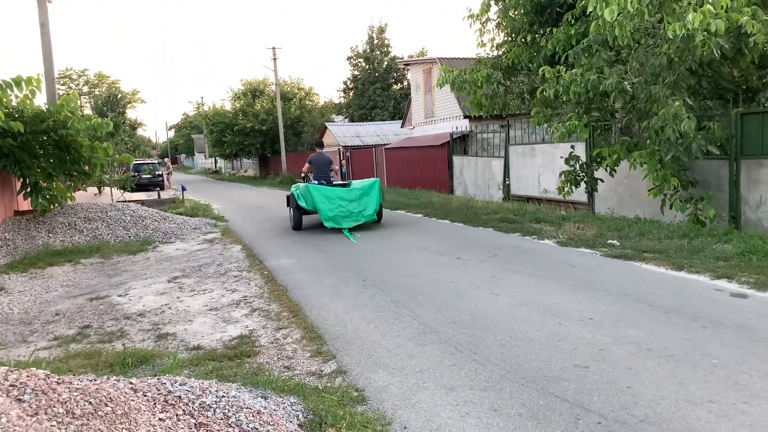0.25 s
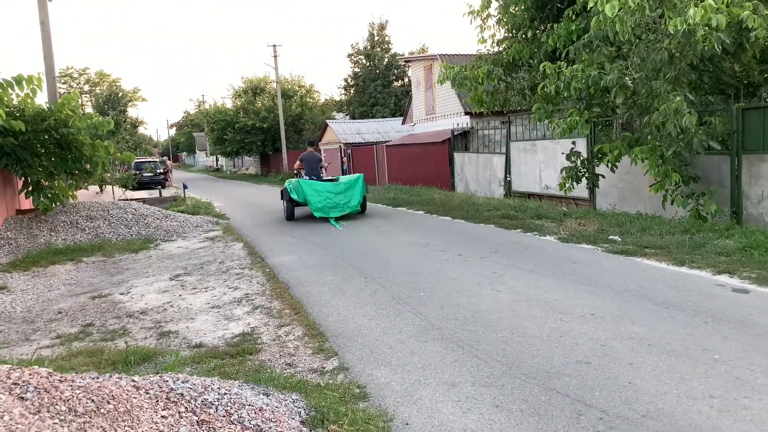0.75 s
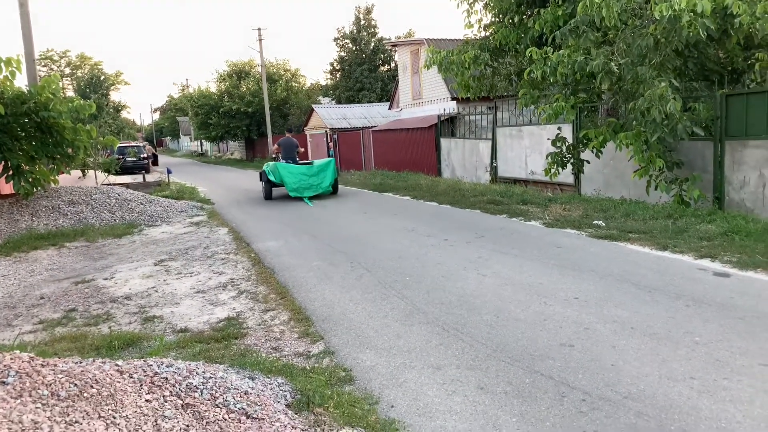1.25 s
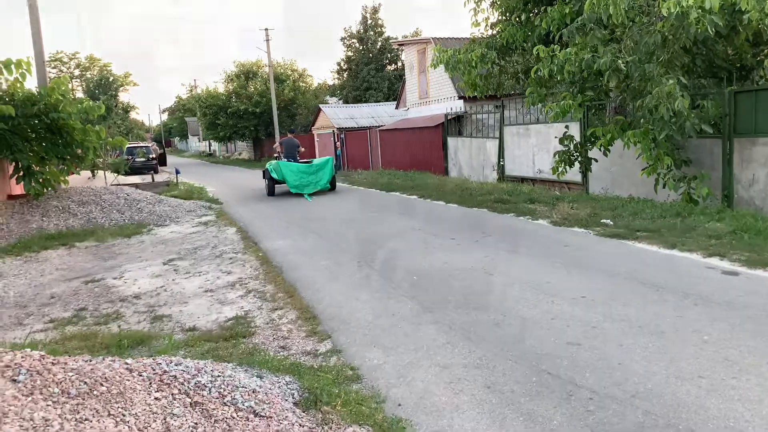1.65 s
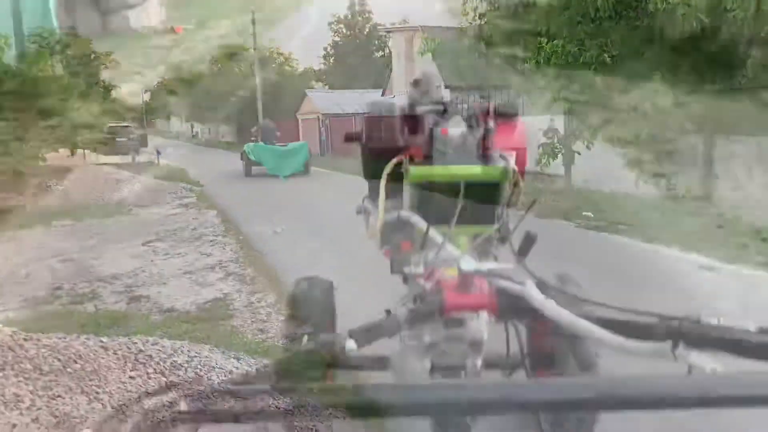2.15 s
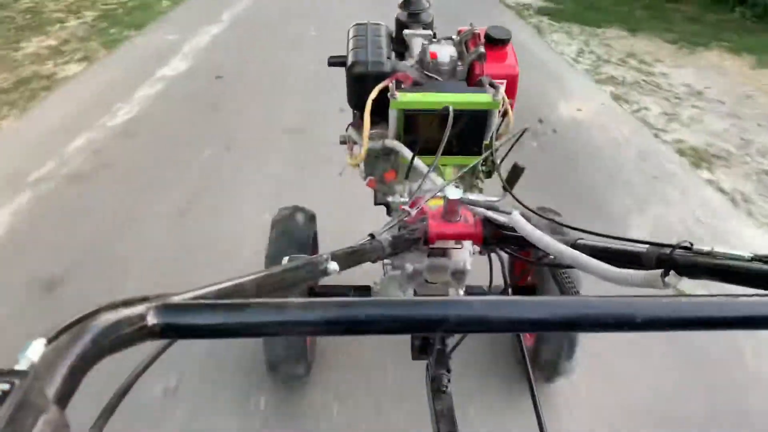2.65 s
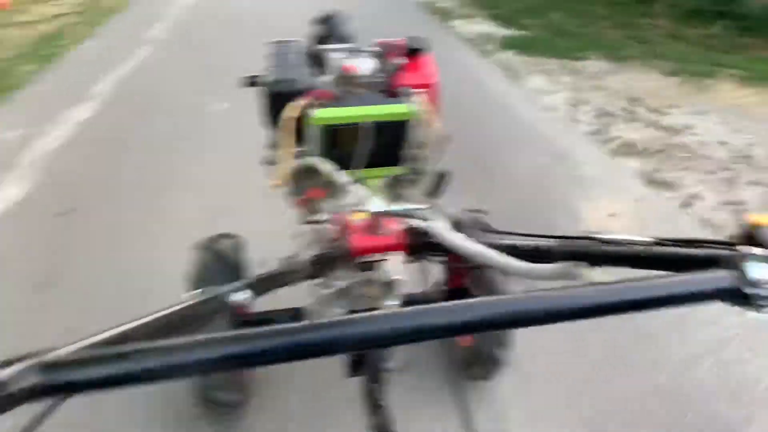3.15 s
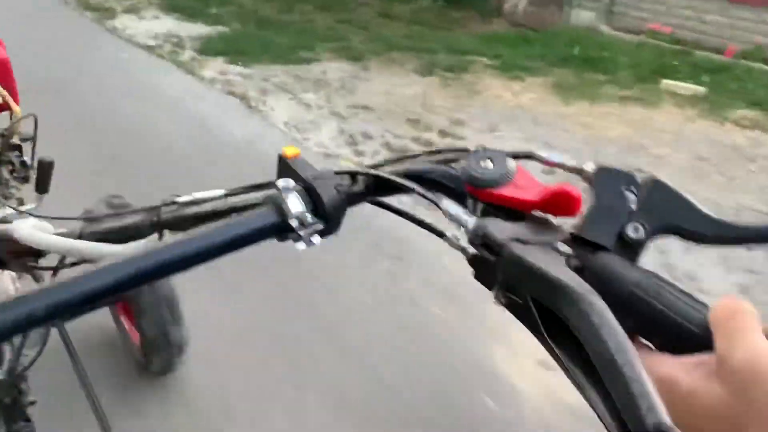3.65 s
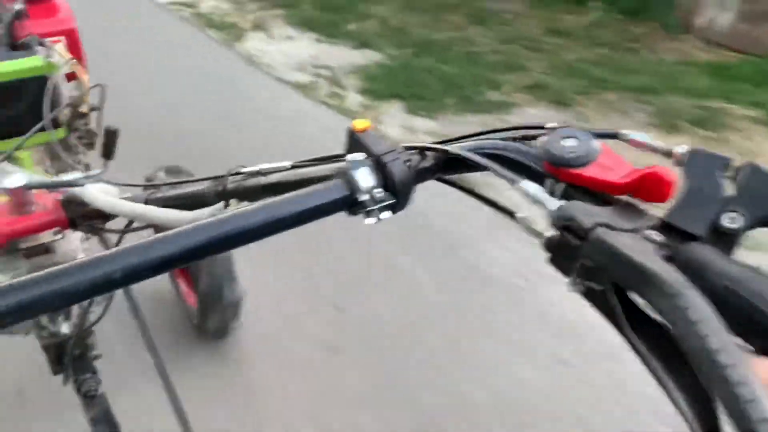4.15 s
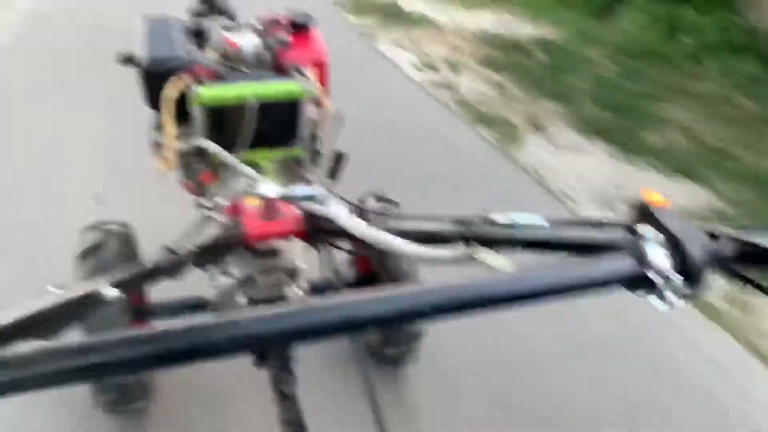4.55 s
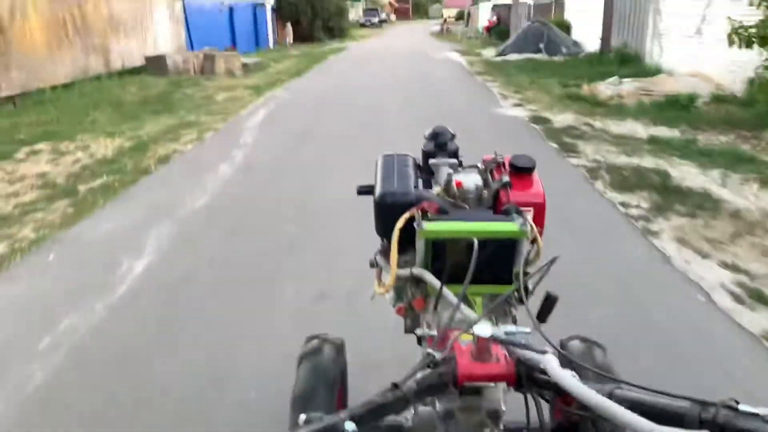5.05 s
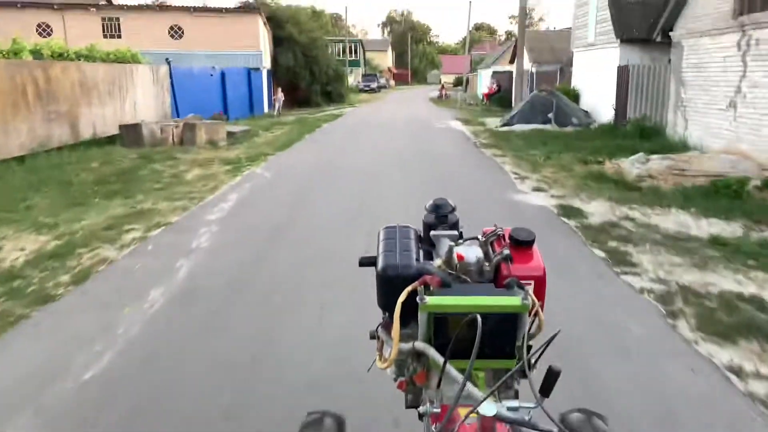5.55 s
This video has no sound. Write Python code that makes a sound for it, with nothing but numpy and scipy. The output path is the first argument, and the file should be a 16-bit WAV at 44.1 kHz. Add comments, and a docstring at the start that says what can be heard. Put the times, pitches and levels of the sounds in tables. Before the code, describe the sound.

A single-cylinder diesel tractor thumps away down a road, a tiny high chirp sounds, then its engine clatters loudly from the driver's seat.

```python
"""A single-cylinder diesel tractor with a trailer drives off down a village road, heard from the verge.
A short, very high chirp sounds; then the verge fades over to the driver's seat, where a hand-held phone
turns away from the engine and swings back, a small dry tick falling on the way.
Throughout, each firing thumps through the exhaust as harmonics and knocks the block into resonance, while
valve gear and tin rattle in time as pulsed noise, over a treble hiss of the phone made of shaped noise."""
import sys
import numpy as np
from scipy import signal
from scipy.fft import rfft, irfft
from scipy.io import wavfile
from scipy.ndimage import uniform_filter1d

SR = 44100
rng = np.random.default_rng(int(sys.argv[2]) if len(sys.argv) > 2 else 0)


def transcribe(signal):
    """Save signal, clipped to [-1, 1], as a 16-bit WAV file at the path in sys.argv[1]."""
    frames = np.atleast_2d(signal).T
    limited = np.clip(frames, -1, 1)
    pcm = np.round(limited * 32767).astype(np.int16)
    wavfile.write(sys.argv[1], SR, pcm)


N = 255780  # samples

# Each: firing rate in Hz, first knock in s, throttle opening in s, rate gained in Hz per s.
VERGE_FIRING = (23.76, 0.021, 1.15, 1.1)
SEAT_FIRING = (25.24, 0.0128, 0, 0)

# Harmonics of the exhaust at the verge, at the seat facing the engine, and there turned away.
# Each row: multiple of the firing rate, relative level in dB.
VERGE_HARMONICS = [(2, 4.5), (3, 6.5), (4, 9), (5, 5.5), (6, 4.5), (7, 6.5), (8, 10), (10, -8), (11, 0.5),
                   (13, -2), (14, 3), (15, -2), (19, -3.5)]
FACING_HARMONICS = [(2, -4.5), (3, -2), (4, -2), (5, 0), (6, -9.5), (7, -1), (8, -4), (9, -34), (10, -7.5),
                    (11, -8), (12, -13), (13, -28), (14, -10.5), (15, -16), (17, 0.5), (19, -13.5),
                    (21, -10), (22, -10)]
TURNED_HARMONICS = [(2, -5.5), (3, -2), (4, 1), (5, 0), (6, -10), (7, -3), (8, -7), (9, -10), (10, -16),
                    (11, -9.5), (12, -5.5), (13, -28), (14, -11.5), (15, -12), (17, -30), (19, -25),
                    (21, -52), (22, -34)]
# Slow beats of single harmonics when turned away, keyed by the multiple of the firing rate.
# Each entry: beat rate in Hz, time of a crest in s, depth in dB at a full turn.
HARMONIC_THROB = {3: (2.27, 4.04, 2.9), 4: (3, 3.95, 2.6)}
# Short signed puffs in one cycle, which set the phases of the harmonics.
# Each row: place in the cycle 0-1, signed strength.
VERGE_PUFFS = [(0.057, -1.0), (0.488, -0.43), (0.794, 0.84)]
SEAT_PUFFS = [(0.198, -0.47), (0.376, 1.0), (0.55, 0.38), (0.879, -0.89)]

# Modes of the block, rung by the knock, and of the cover, rung by the valves half a cycle later.
# Each row: frequency in Hz, width in Hz, relative level in dB left and right facing the engine, then left
# and right turned away, extra lag of the right port in ms when facing, start in cycles after the firing,
# further cycles to the second blow, relative level of that blow in dB.
BLOCK_MODES = [(1168, 121, 19.5, -1, -6, 3, 0.09, -0.0482, 0.36, -8.5),
               (1369, 370, -14, -24.5, -3.5, 3.5, -0.033, -0.0427, 0.44, -13.5),
               (1635, 190, -7.5, -52, -16, -3, -0.21, -0.02, 0.31, -7.5),
               (1804, 165, -30.5, -19, -5.5, -13.5, -0.1, -0.03, 1, -11),
               (2105, 168, 6, 15, -17, -22.5, -0.032, 0.005, .45, -12),
               (2239, 185, -36, -28, -6, -3, 0.37, -0.0112, 0.15, -13),
               (2522, 220, -18, -21, -4, -11, 0.0046, -0.0098, 0.446, -18),
               (3008, 190, -14, -26, -14.5, -10, 0.014, 0.0262, 0.5, -8),
               (3320, 220, -33, 0, -15, -18.5, -0.046, -0.0076, 0.35, -9),
               (3530, 1170, -17, -15.5, -11, -9, 0.24, -.005, 0.26, -17),
               (3530, 260, -15, -7, -24, -24, 0.05, -0.0074, 0.21, -10),
               (3785, 150, -20, -14, -16, -15.5, 0.34, 0.0027, 0.293, -2),
               (4047, 290, -1.5, -5.5, -22, -27, 0.26, -0.0094, 0.22, -8.5),
               (4456, 340, -39.5, -17.5, -26.5, -10.5, 0.33, 0.035, 0.69, -5),
               (6440, 510, -49, -42, -38, -12, 0.29, 0.038, 0.98, -14)]
COVER_MODES = [(550.4, 110, -16, -20, -18, -36, 0.0, 0.46, .55, -2),
               (704.6, 210, -4, -3, -5, -26, 0.036, .44, .55, -2),
               (848, 247, -7.5, 0, 3.5, -7.5, 0.053, 0.42, 0.92, -10),
               (961, 153, -7, -14, -6, -4.5, 0.026, 0.43, 0.54, -11)]
# The same block from afar. Each row: frequency in Hz, width in Hz, relative level in dB.
VERGE_BLOCK_MODES = [(773, 280, 7), (1000, 290, 2), (1323, 100, 14), (1500, 170, 8.5), (1824, 200, 9.5),
                     (2101, 140, 6.5), (2300, 260, 1.5), (2820, 550, 4), (3290, 620, 8), (3930, 430, 3.5)]
# Strokes that stand out at the verge. Each row: time in s, level above the rest in dB.
HARD_KNOCKS = [(.114, 4.5), (.198, 4), (.24, 2), (.282, 3), (.366, 3), (.408, 1), (.534, 4.5), (.745, 4.5),
               (.913, 3)]

# Spectra of rattling tin and trailer, and of the hiss. Each row: frequency in Hz, relative dB per Hz.
VERGE_RATTLE = [(88, -23), (150, -9), (197, -11), (232, -11), (319, -11.5), (477, -14.5), (534, -13.5),
                (1270, -12.5), (1650, -18), (2310, -18), (4200, -27), (5200, -31), (7000, -33.5),
                (9100, -73), (15400, -120)]
SEAT_RATTLE = [(88, -9.5), (150, -3), (517, -6.5), (866, -6.5), (1080, -8.5), (1400, -8.5), (1780, -11.5),
               (2130, -7.5), (3100, -16), (3920, -15.5), (5200, -20.5), (7000, -22.5), (9100, -107),
               (15400, -120)]
HISS_SPECTRUM = [(4500, -64), (6000, -2), (7500, 1.5), (9500, 3.5), (11000, 2), (13000, -1.5), (16000, -1)]

# Turning of the phone. Each row: time in s, share turned from the engine 0-1, lag of the right port in ms.
PHONE_TURN = [(1.8, 0.43, 0.11), (2.4, 0.48, .13), (2.85, 0.48, 0.14), (3.05, 0.62, .2), (3.15, 0.6, 0.25),
              (3.25, 0.79, 0.29), (3.4, 0.86, 0.43), (3.85, 0.84, 0.4), (4.15, 0.82, 0.4), (4.3, 0.79, .34),
              (4.45, 0.62, 0.27), (4.6, 0.6, 0.2), (4.85, 0.53, 0.14), (5.0, 0.46, 0.11), (5.4, 0.45, 0.11)]
# Colour of the ringing modes at middle turn values, nearly full facing the engine, weaker turned away;
# colour on passing the engine's flank; colour once the phone is raised; and at the verge, a fixed colour
# that grows as the tractor draws away. Each row: frequency in Hz, gain in dB.
MIDDLE_TURN_COLOUR = [(900, 1.5), (1165, -2.5), (1400, 7.5), (1620, 9.5), (2100, 6.5), (2500, 7),
                      (3000, 8.5), (3500, 5.5), (4000, 4.5)]
FLANK_COLOUR = [(1000, -0.5), (1180, -1.5), (1400, 2), (1620, 5.5), (1850, -1.5), (2110, -3), (2400, 0)]
RAISED_COLOUR = [(70, 0.5), (100, 1), (150, -3), (950, -0.5), (1200, 1.5), (1380, 5), (1650, -3.5),
                 (1850, -3), (2100, 1), (2600, -1.5), (3100, -1), (3500, 3.5), (4000, 1.5), (5500, -1)]
DISTANT_COLOUR = [(200, -3), (300, 5), (500, -0.5), (1500, -1.5), (2200, -0.5), (3300, -4.5), (4000, 1.5),
                  (4700, 0.5), (6500, -2.5), (11000, -9)]

# Each: exhaust, clatter, hiss; the levels are those before the fade from verge to seat.
VERGE_DB = (-32, -32.5, -44.5)  # at the start
RECEDE_DB_PER_S = (-0.5, 0.5, -2.5)  # as the tractor draws away
SEAT_DB = (-22.5, -21, -29.5)  # at a turn value of 0
TURNED_GAIN_DB = (1, 1.23, -3.5)  # added at a turn value of 1

FADE_S = (1.504, 2.54)  # start and end of the even fade from verge to seat
SWEEP_S = (4.37, 4.8, 5.06)  # start, middle and end of the sweep past the flank
RAISE_S = (4.3, 5.3)  # swinging back, the phone ends aimed higher
KNOCK_FADE_DB_PER_S = -4  # within the clatter, as the trailer hides the receding engine
HARD_KNOCK_S = 0.012  # time from the crest of a hard stroke to 1/e of its dB
VERGE_LAG_MS = 0.4265  # by which the right port hears the clatter late
COVER_LAG_SHARE = 0.15  # the cover lies nearer the middle between the ports
LINGER_SHARE, LINGER_DB = 0.1, -26.5  # faint long ring: share of the mode's width, gain
PATCHY_DB, PATCHY_PER_S = 1.2, 3  # mode levels vary as the hand sways; depth grows with the turn
CHIRP_S, CHIRP_DB, CHIRP_HZ = 1.418, -23.5, 10230  # time and peak of the loudest pulse, mean pitch
CHIRP_PULSES_HZ, CHIRP_RISE_DB_PER_S, CHIRP_FALL_DB_PER_S = 121, 560, 611
CHIRP_BEFORE, CHIRP_AFTER = 3, 1  # pulses around the loudest
ECHO_DB, ECHO_T60_S = -14, 0.53  # start relative to the chirp, decay by 60 dB
TICK_S, TICK_DB, TICK_T60_S = 4.571, -22, 0.034  # level of the noise before its high-pass
TOP_HZ = 15900


def exhaust(firing, harmonics, puffs, waver_db, right_db, lag_ms):
    """Fourier synthesis: a periodic thump is a sum of harmonics, phased by the puffs of one cycle."""
    turns = turned(firing)
    place, strength = np.transpose(puffs)
    thump = 0
    for k, db in harmonics:
        start = np.angle(np.sum(strength * np.exp(-2j * np.pi * k * place)))
        # roadside walls and bumps make every harmonic waver on its own
        gain = undb(db + waver_db * walk(8))
        thump = thump + gain * np.cos(2 * np.pi * k * turns + start)
    right = lag(thump, lag_ms) * undb(right_db)
    return level(np.array([thump, right]), 0)


def throb(k, turn):
    """Amplitude modulation: the level of one harmonic beats sinusoidally in dB, deeper with the turn."""
    rate, crest_s, depth_db = HARMONIC_THROB.get(k, (0, 0, 0))
    return depth_db * turn * np.cos(2 * np.pi * rate * (np.arange(N) / SR - crest_s))


def body(modes, turn, port_ms, scatter, turned_late):
    """Modal synthesis: two blows a cycle ring resonances whose level and lag at each port vary with the turn."""
    out = 0
    middle_share = 4 * turn * (1 - turn)  # 1 at a turn value of 0.5
    rough = 0.015 + scatter * turn ** 2  # less direct sound, more scatter
    for hz, width_hz, *db, lag_ms, start, again, again_db in modes:
        facing, away = np.reshape(db, (2, 2, 1))
        start = start + turned_late * turn  # the way round is longer
        first = blows(SEAT_FIRING, start, 1.0, rough, 0.22)
        second = blows(SEAT_FIRING, start + again, 1.2, rough, 0.19)
        rung = ring(first + undb(again_db) * second, hz, width_hz)
        ports = np.array([rung, lag(rung, port_ms + (1 - turn) * lag_ms)])
        patchy_db = PATCHY_DB * (0.5 + turn) * drift(PATCHY_PER_S)
        colour_db = middle_share * np.interp(hz, *np.transpose(MIDDLE_TURN_COLOUR))
        out = out + undb(facing + turn * (away - facing) + colour_db + patchy_db) * ports
    return out


def distant_knock(t):
    """Modal synthesis from afar: shared blows ring every mode, a few strokes standing out."""
    first = blows(VERGE_FIRING, 0.0202, 1.6, 0.095, 0.13)
    second = blows(VERGE_FIRING, 0.45, 1.9, 0.074, 0.18)
    hits = first + undb(-2.5) * second
    knock = 0
    for hz, width_hz, db in VERGE_BLOCK_MODES:
        knock = knock + undb(db + 2.0 * drift(5.67)) * ring(hits, hz, width_hz)
    hard_db = sum(db * np.exp(-((t - s) / HARD_KNOCK_S) ** 2) for s, db in HARD_KNOCKS)
    return level(knock * undb(KNOCK_FADE_DB_PER_S * t + hard_db), -5.5)


def blows(firing, late, scatter_db, rough, tail):
    """Impulsive excitation: one blow a cycle of random strength, trailed by a burst of small random impacts."""
    cycle = crank(firing, late)[1]
    strength = undb(scatter_db * rng.standard_normal(cycle[-1] + 1))[cycle]
    impulse = np.diff(cycle, prepend=cycle[0])
    burst = swell_after(firing, late, tail) * rng.standard_normal(N)
    return strength * (impulse + rough * burst)


def resonate(x, hz, width_hz, order):
    """Damped resonance: a complex pole, repeated `order` times, rings at its frequency and decays by its width."""
    pole = np.exp((2j * hz - width_hz) * np.pi / SR)
    return signal.lfilter([(width_hz * np.pi / SR) ** order], np.poly([pole] * order), x)


def ring(x, hz, width_hz):
    """Repeated poles: a blow spread through the casting rings as a round hump, then lingers faintly."""
    spread = resonate(x, hz, width_hz, order=2)
    hump = resonate(spread, hz, width_hz, order=2)
    linger = resonate(spread, hz, LINGER_SHARE * width_hz, order=1) / np.sqrt(LINGER_SHARE)
    return (hump + undb(LINGER_DB) * linger).imag / np.sqrt(width_hz)


def rattle(firing, spectrum, alike, swell, tail):
    """Modulated noise: loose parts shake all the time, thin ones hardest around the knock, less near the valves."""
    at_knock = swell_after(firing, -0.087, tail, 0.29)
    at_valves = swell_after(firing, 0.49, tail, 0.45)
    beat = swell * (at_knock + 0.1 * at_valves)
    shake = pair(alike) * undb(2.1 * walk(60))
    thin = highpass(shake * beat, 1200)
    return level(colour(shake + thin, spectrum), 0)


def hiss(firing, swell):
    """Modulated noise: a steady treble hiss of the phone flutters and swells once a cycle, the right port leading."""
    beat = 1 + swell * swell_after(firing, -0.018, 0.23, 0.073)
    left, right = pair(0.86) * beat * undb(0.78 * walk(7.5) + 2.65 * walk(40))
    hz = np.fft.rfftfreq(N, 1 / SR)
    # a lead of 1/4900 s, with the two ports in phase at 11 kHz
    right = irfft(rfft(right) * np.exp(2j * np.pi * (hz - 11000) / 4900), N)
    return level(colour([left, right], HISS_SPECTRUM), 0)


def verge():
    """Distant source: a blurred, uneven knock with much rattle, a fixed colour growing as it draws away."""
    t = np.minimum(np.arange(N) / SR, FADE_S[1])
    note_db, clatter_db, hiss_db = (db + slope * t for db, slope in zip(VERGE_DB, RECEDE_DB_PER_S))
    left, right = distant_knock(t) + rattle(VERGE_FIRING, VERGE_RATTLE, 0.24, 1.4, 0.28)
    clatter = np.array([left, lag(right, VERGE_LAG_MS)])
    away = np.minimum(t / FADE_S[0], 1)
    clatter = blend(clatter, DISTANT_COLOUR, away)
    note = exhaust(VERGE_FIRING, VERGE_HARMONICS, VERGE_PUFFS, 0.66, 1.7, 0.1)
    treble = hiss(VERGE_FIRING, 0.58)
    return undb(note_db) * note + undb(clatter_db) * clatter + undb(hiss_db) * treble


def seat():
    """Near source with a delay between ports: the further the phone turns, the later the right one hears clatter."""
    t = np.arange(N) / SR
    turn, port_ms = np.clip(curves(PHONE_TURN), 0, 1)
    note_db, clatter_db, hiss_db = (db + gain * turn for db, gain in zip(SEAT_DB, TURNED_GAIN_DB))
    block = level(body(BLOCK_MODES, turn, port_ms, 0.11, 0.03), -3.5)
    cover = level(body(COVER_MODES, turn, COVER_LAG_SHARE * port_ms, 0.0069, 0.02), -11.0)
    left, right = rattle(SEAT_FIRING, SEAT_RATTLE, 0.35, 2.3, 0.16) * undb(-4.0)
    clatter = block + cover + np.array([left, lag(right, port_ms)])
    harmonics = []
    for (k, db), (_, away_db) in zip(FACING_HARMONICS, TURNED_HARMONICS):
        harmonics.append((k, db + turn * (away_db - db) + throb(k, turn)))
    note = exhaust(SEAT_FIRING, harmonics, SEAT_PUFFS, 1.7, 2.0, 0.2)
    treble = hiss(SEAT_FIRING, 1.18)
    near = undb(note_db) * note + undb(clatter_db) * clatter + undb(hiss_db) * treble
    near = blend(near, FLANK_COLOUR, np.interp(t, SWEEP_S, (0, 1, 0)))
    return blend(near, RAISED_COLOUR, np.interp(t, RAISE_S, (0, 1)))


def chirp():
    """Pulsed tone of wandering pitch: quick pulses swell and sink, and house fronts smear an echo after them."""
    t = np.arange(N) / SR - CHIRP_S
    at = np.arange(-CHIRP_BEFORE, CHIRP_AFTER + 1) / CHIRP_PULSES_HZ
    pulse_db = CHIRP_DB + np.minimum(CHIRP_RISE_DB_PER_S * at, -CHIRP_FALL_DB_PER_S * at)
    envelope = sum(undb(db) * np.exp(-((t - s) / 0.0027) ** 2) for s, db in zip(at, pulse_db))
    wander = 1.9 * np.cumsum(walk(280)) * 600 / SR  # radians
    call = envelope * np.sin(2 * np.pi * CHIRP_HZ * t + wander)
    smear = level(ring(rng.standard_normal((2, N)), CHIRP_HZ, 600), CHIRP_DB + ECHO_DB)
    onset = np.clip(t * CHIRP_PULSES_HZ, 0, 1)
    decay = undb(-60 * np.maximum(t, 0) / ECHO_T60_S)
    return call + smear * onset * decay


def tick():
    """Impulsive noise: a small dry tick is treble noise that starts at once and decays exponentially."""
    t = np.arange(N) / SR - TICK_S
    bright = highpass(rng.standard_normal(N), 5000)
    return (t > 0) * bright * undb(TICK_DB - 60 * np.maximum(t, 0) / TICK_T60_S)


def turned(firing):
    """Phase as the integral of rate: cycles since the first knock, with a steady rise once the throttle opens."""
    rate, first_s, throttle_s, gain = firing
    t = np.arange(N) / SR
    return (t - first_s) * rate + gain / 2 * np.maximum(t - throttle_s, 0) ** 2


def crank(firing, late):
    """Cyclic phase: share of the cycle passed since `late` cycles after the knock, and the cycle count."""
    turns = turned(firing) - late + 2  # the 2 keeps the count positive
    return turns % 1, turns.astype(int)


def swell_after(firing, late, tail, rise=0.061):
    """Exponential envelope: a swell once a cycle builds over `rise` cycles and dies away over `tail` cycles."""
    phase = crank(firing, late)[0]
    return (1 - np.exp(-phase / rise)) * np.exp(-phase / tail)


def pair(alike):
    """Partial coherence: two noises share a given correlation in the treble and are the same in the bass."""
    mid, side = rng.standard_normal((2, N))
    side = highpass(side, 700)
    alike = np.clip(alike, 0, 1)
    return np.sqrt(1 + alike) * mid + np.sqrt(1 - alike) * side * np.array([[1], [-1]])


def walk(rate):
    """Smoothed random process: a moving average slews between random levels held for 1 / rate s."""
    k = int(SR / rate)
    held = np.repeat(rng.standard_normal(N // k + 1), k)
    return 0.58 * uniform_filter1d(held, k)[:N]


def drift(rate):
    """Interpolated random process: straight lines join random levels every 1 / rate s."""
    at = np.arange(N) * rate / SR
    return np.interp(at, np.arange(100), rng.standard_normal(100))


def lag(x, ms):
    """Propagation delay: reading the wave at an earlier, possibly moving, instant makes it arrive late."""
    return np.interp(np.arange(N) - ms * SR / 1000, np.arange(N), x)


def colour(x, table):
    """Spectral filtering: each frequency takes the gain read from a table along a logarithmic axis."""
    hz, db = np.transpose(table)
    log_hz = np.log(np.maximum(np.fft.rfftfreq(N, 1 / SR), 1))
    return irfft(rfft(x) * undb(np.interp(log_hz, np.log(hz), db)), N)


def blend(x, table, share):
    """Crossfaded filtering: a moving share of the coloured sound replaces the plain one."""
    return x + share * (colour(x, table) - x)


def highpass(x, hz):
    """Second-order high-pass: energy below the corner is attenuated."""
    return signal.sosfilt(signal.butter(2, hz, "high", fs=SR, output="sos"), x)


def curves(table):
    """Linear interpolation: the columns of a time table, sample by sample."""
    s, *columns = np.transpose(table)
    return [np.interp(np.arange(N) / SR, s, column) for column in columns]


def undb(db):
    """Logarithmic level: 20 dB is a factor of ten in amplitude."""
    return 10 ** (np.asarray(db) / 20)


def level(x, db):
    """Effective value: scale to an rms level over the whole length."""
    return x * undb(db) / np.sqrt(np.mean(x ** 2))


def scene():
    """Superposition: the verge fades linearly into the seat, with the chirp and the tick added."""
    share = np.interp(np.arange(N) / SR, FADE_S, (0, 1))
    return (1 - share) * verge() + share * seat() + chirp() + tick()


def record(dry):
    """Band limitation: the phone cuts the top with a steep elliptic low-pass."""
    return signal.sosfilt(signal.ellip(10, 0.2, 80, TOP_HZ, fs=SR, output="sos"), dry)


dry = scene()
out = record(dry)
transcribe(out)
```